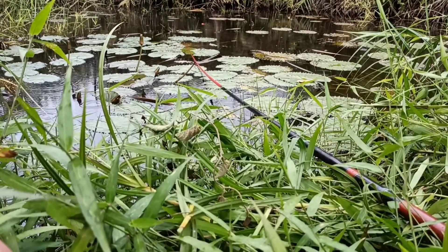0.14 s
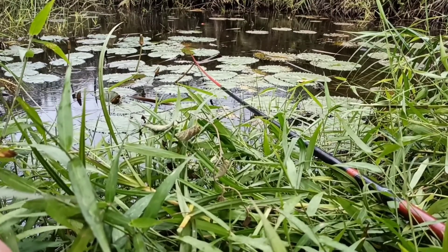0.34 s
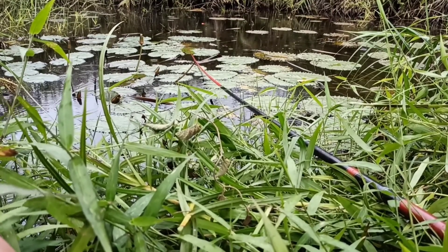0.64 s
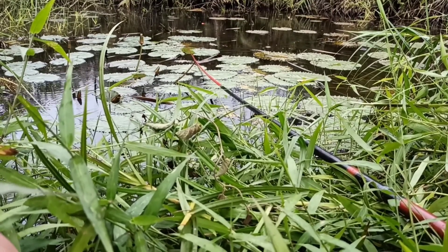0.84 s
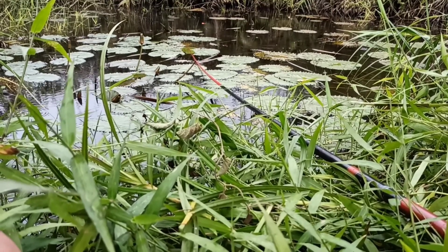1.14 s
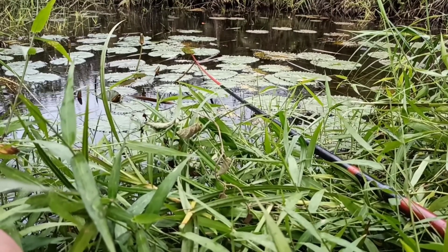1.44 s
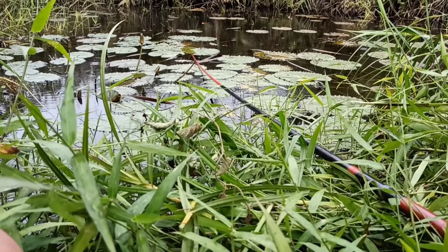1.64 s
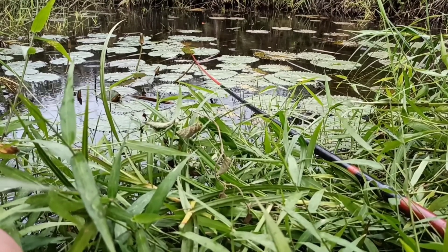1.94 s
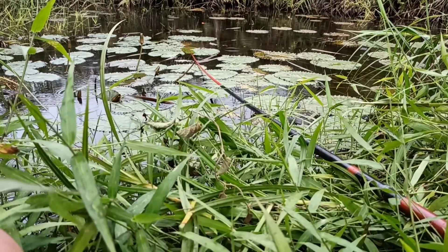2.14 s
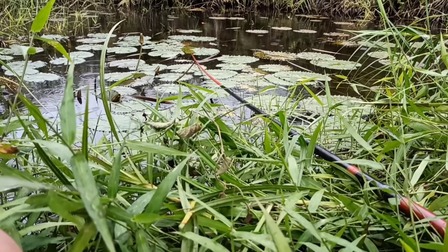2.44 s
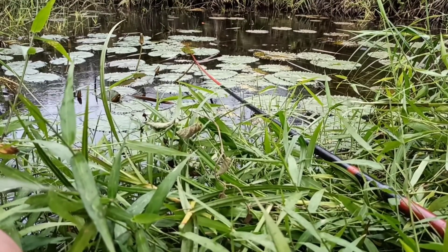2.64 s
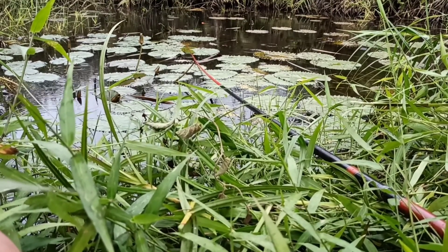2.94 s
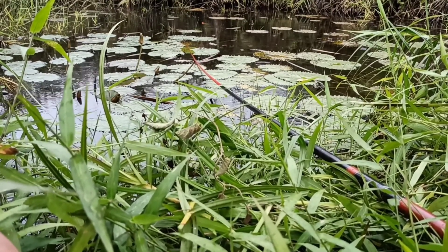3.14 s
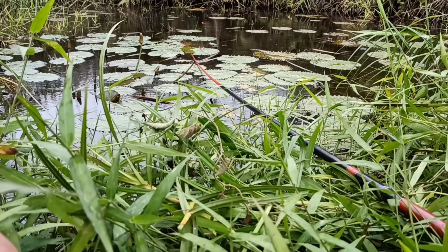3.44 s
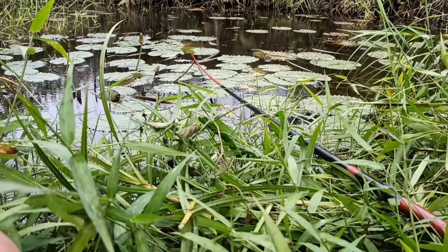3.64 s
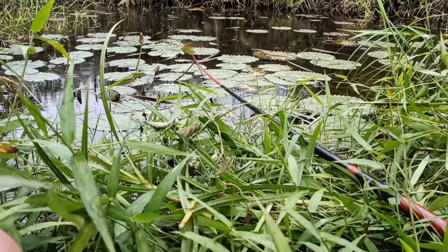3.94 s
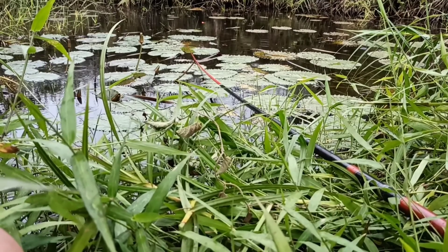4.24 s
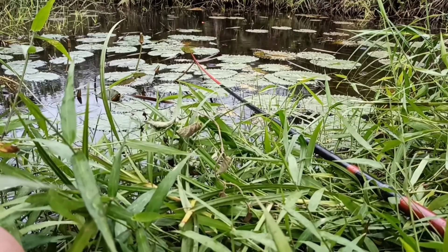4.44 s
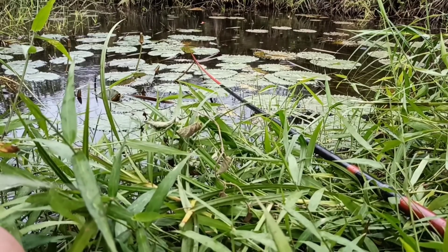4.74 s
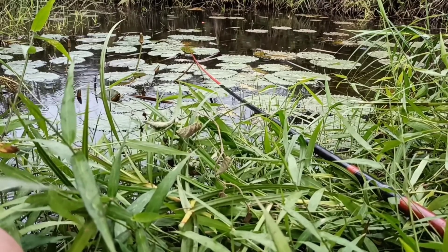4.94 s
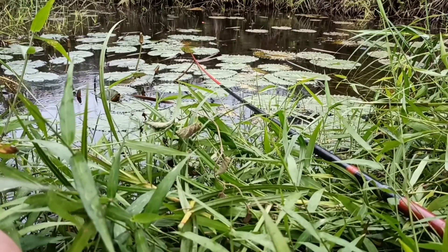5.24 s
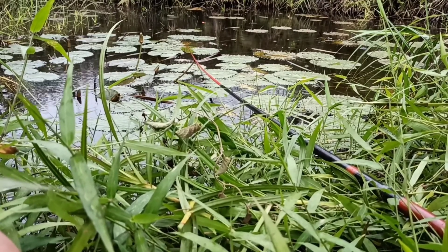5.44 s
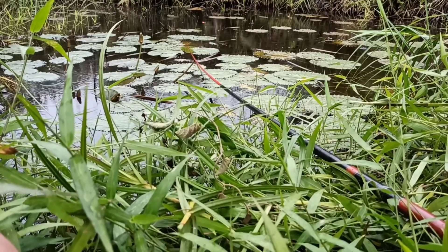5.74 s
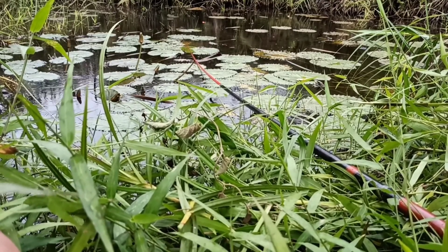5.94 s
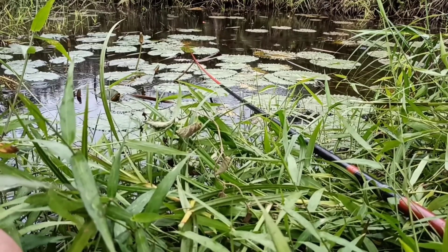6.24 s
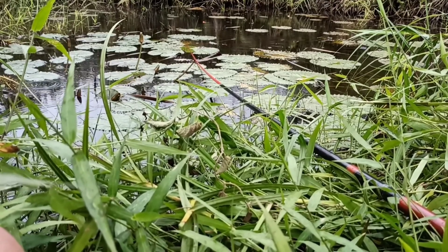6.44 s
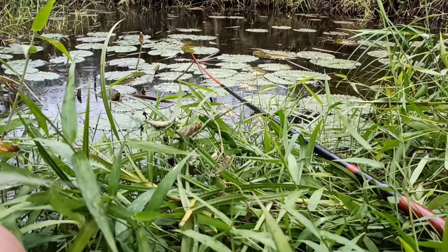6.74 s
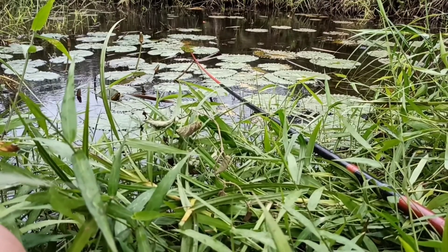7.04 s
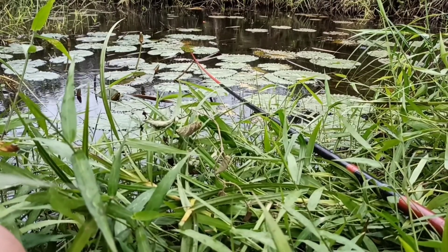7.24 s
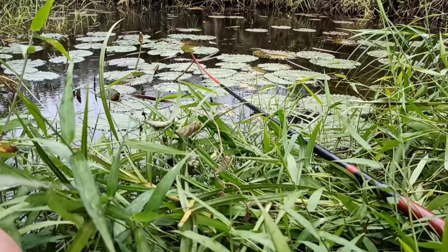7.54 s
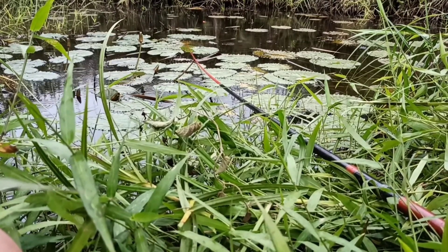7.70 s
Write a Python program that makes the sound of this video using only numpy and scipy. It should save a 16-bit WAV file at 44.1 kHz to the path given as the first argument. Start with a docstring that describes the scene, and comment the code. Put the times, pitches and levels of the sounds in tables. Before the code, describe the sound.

Outdoor mono pickup close to waterside plants: short, dry, creaky frog clicks about seven per second, first a very near frog, later another somewhat quieter one, with faint frogs overlapping behind. A high, fast cricket trill fills the first half and then ceases. Tiny leaf crackles and stem ticks pepper a quiet bed of distant frogs, shimmering insects, soft air and low engine hum, with slight scatter from reeds and bank.

```python
"""Small frogs, near and far, call in runs of rattling clicks at a weedy pond by day.
Each call is a row of pulses ringing a vocal sac and throat, with scatter from reeds and bank.
A cricket's gated wing tone trills until it is disturbed; high peeps slide down.
Stems tick and leaves crackle as noise puffs; far frogs, insects, a far engine and air are
coloured noise whose bands flicker in level."""
import sys
import numpy as np
from scipy import signal
from scipy.fft import rfft, irfft, next_fast_len
from scipy.io import wavfile

SR = 44100
rng = np.random.default_rng(int(sys.argv[2]) if len(sys.argv) > 2 else 0)


def master(y):
    """Save y as 16-bit WAV."""
    cut = np.clip(np.atleast_2d(y).T, -1, 1)
    pcm = np.round(cut * 32767)  # scale
    wavfile.write(sys.argv[1], SR, pcm.astype(np.int16))


N = 347067


def from_db(db):
    """Decibels to amplitude gain."""
    return 10 ** (np.asarray(db) / 20)


def rms_one(x):
    """Scale to rms 1."""
    return x / np.sqrt(np.mean(x ** 2) + 1e-20)


def gain_curve(rows):
    """Gain per sample from (time [s], level [dB]) rows."""
    return from_db(np.interp(np.arange(N) / SR, *np.transpose(rows)))


def drift(rate_hz):
    """Linear interpolation between unit-spread random points, rate_hz of them a second."""
    points = rng.standard_normal(1000)
    return np.interp(np.arange(N) / SR * rate_hz, np.arange(1000), points)


def coloured(spectrum, patchy_db, rate_hz):
    """Noise of rms 1 with this spectrum, in six overlapping bands that flicker independently."""
    size = next_fast_len(N)
    log_hz = np.log(np.arange(size // 2 + 1) * SR / size + 1e-3)
    points_hz, points_db = np.transpose(spectrum)
    log_points = np.log(points_hz)
    tone_db = np.interp(log_hz, log_points, points_db, -120, -120)
    bins = rfft(rng.standard_normal(size)) * from_db(tone_db)
    place = np.interp(log_hz, log_points[[0, -1]], [0, 5])
    total = np.zeros(N)
    for k in range(6):
        weight = np.sqrt(np.clip(1 - abs(place - k), 0, 1))
        band = irfft(bins * weight, size)[:N]
        total += band * from_db(patchy_db * drift(rate_hz))
    return rms_one(total)


def add(out, start_s, sound):
    """Mix a sound in at start_s."""
    at = round(start_s * SR)
    out[at:at + len(sound)] += sound[:max(N - at, 0)]


def air():
    """Steady broadband noise with flickering bands."""
    # Air spectrum: (frequency [Hz], relative level [dB])
    air_tone = [(600, 6.5), (5000, -5), (8400, -10), (10000, -7.5), (11600, -9.5), (12900, -4),
                (13200, 0.5), (15700, 4)]
    return from_db(-66.5) * coloured(air_tone, patchy_db=2.3, rate_hz=30)


def engine():
    """Far engine hum: mostly low noise on a slow level curve."""
    # Engine level: (time [s], rms level [dB])
    engine_level = [(0, -56), (3, -57), (5, -57), (6.2, -55), (7.87, -56)]
    # Engine spectrum: (frequency [Hz], relative level [dB])
    engine_tone = [(12, -53), (20, -24), (22, -34), (32, -36), (35, -49), (48, -13.5), (108, 3), (144, -2),
                   (181, -4.5), (224, -6), (369, -14.5), (821, -25), (981, -23.5), (1240, -34.5),
                   (1400, -26), (1820, -33.5), (3080, -120)]
    return gain_curve(engine_level) * coloured(engine_tone, patchy_db=1.26, rate_hz=5)


def shimmer():
    """Insect chorus blurred into high noise with fast level flicker."""
    # Shimmer level: (time [s], rms level [dB])
    shimmer_level = [(0, -57), (1.1, -59), (3.2, -59), (3.9, -57.5), (4.4, -59.5), (7.87, -59)]
    # Shimmer spectrum: (frequency [Hz], relative level [dB])
    shimmer_tone = [(3350, -52), (5700, -17), (5880, -17), (6140, -7.5), (6470, 4.5), (6780, 8.5),
                    (7140, 3), (7560, 5), (7780, -13.5), (7980, -10.5), (8470, -11), (8630, -32),
                    (8800, -22), (8860, -20), (9000, -37), (11700, -62), (19800, -120)]
    return gain_curve(shimmer_level) * coloured(shimmer_tone, patchy_db=2.5, rate_hz=70)


def chorus():
    """Far frogs blurred together into flickering noise."""
    # Far chorus level: (time [s], rms level [dB])
    chorus_level = [(0, -60), (.5, -60), (1.2, -62), (2.5, -61), (3.2, -63), (3.7, -60), (4.3, -63),
                    (5.2, -61), (6.6, -62.5), (7.6, -59.5), (7.87, -64)]
    # Far chorus spectrum: (frequency [Hz], relative level [dB])
    chorus_tone = [(680, -48), (1150, -11.5), (1300, -32), (1650, -6.5), (1890, -6.5), (2890, -12.5),
                   (3220, -5), (3910, 5.5), (4580, -3.5), (4980, -19), (5200, -46), (6760, -55),
                   (11400, -120)]
    return gain_curve(chorus_level) * coloured(chorus_tone, patchy_db=3.0, rate_hz=22)


def crackle():
    """Tiny random ticks in the leaves: sparse bright clicks of uneven size."""
    rate_per_s, faintest_db = 30, -62.5   # level ahead of the filters
    born = rng.random(N) < rate_per_s / SR
    extra_db = 5.5 * np.minimum(rng.exponential(1, N), 2.5)
    clicks = born * from_db(faintest_db + extra_db)
    decay = signal.lfilter([1], [1, -.97], clicks + 1e-18)   # dies within a few ms
    puffs = decay * rng.standard_normal(N)
    return signal.sosfilt(signal.butter(2, 5500, "high", fs=SR, output="sos"), puffs)


def ticks():
    """Very short decaying noise puffs, each coloured by the stem that snaps."""
    # Stem ticks: (time [s], peak level [dB], band centre [Hz], band width [octaves])
    tick_rows = [(.132, -46, 8000, 1.6), (.2075, -37, 8000, .3), (.721, -43, 2270, 2.2),
                 (1.292, -49, 9000, 1.5), (2.46, -49, 8350, .5), (2.687, -47, 7500, .9),
                 (2.78, -49, 1910, .5), (2.898, -50, 2800, .44), (3.3265, -41, 3700, .6),
                 (3.3265, -43, 7200, .4), (3.654, -48.5, 2200, .4), (4.133, -47.5, 2774, .29),
                 (4.311, -41, 13000, .9), (4.385, -46, 13900, .6), (4.485, -36, 3900, .35),
                 (4.4855, -29, 7200, .3), (4.487, -50, 1150, .47), (4.851, -49, 10000, .9),
                 (5.124, -52, 6570, 1.0), (5.878, -47, 9820, .9), (5.9855, -44, 13000, .4),
                 (5.9865, -36, 7300, .35), (6.165, -51, 11500, .7), (7.7, -48, 4000, .6)]
    t60_s = 0.0076
    out, t = np.zeros(N), np.arange(600) / SR
    for start_s, peak_db, centre_hz, octaves in tick_rows:
        puff = rng.standard_normal(600) * from_db(-60 * t / t60_s)
        edges_hz = centre_hz * 2 ** (np.array([-.5, .5]) * octaves)
        edges_hz = np.minimum(edges_hz, [15000, 20000])
        snap = signal.sosfilt(signal.butter(2, edges_hz, "band", fs=SR, output="sos"), puff)
        add(out, start_s, from_db(peak_db) * snap / abs(snap).max())
    return out


def peeps():
    """Thin sine whistles sliding down 300 Hz under a half-sine envelope."""
    # Peeps: (time [s], peak level [dB], mid pitch [Hz], length [s])
    peep_rows = [(6.612, -61, 8310, 0.035), (7.45, -60, 8310, 0.035)]
    out = np.zeros(N)
    for start_s, peak_db, hz, length_s in peep_rows:
        t = np.arange(round(length_s * SR)) / SR
        envelope = np.sin(np.pi * t / length_s)
        cycles = hz * t + 150 * t * (1 - t / length_s)
        add(out, start_s, from_db(peak_db) * envelope * np.sin(2 * np.pi * cycles))
    return out


def cricket():
    """Near-pure wing tone, gated stroke by stroke, sinking in pitch along each chirp."""
    # Wing strokes of one chirp: (place in the chirp [0-1], relative level [dB])
    strokes = [(.17, -4), (.51, 2), (.81, 6.5)]
    chirps_per_s, slowing_per_s2, first_place = 37.29, .08, .625   # rate and place at 0 s
    wing_hz, waver_hz, sink_hz = 7256, 11, 70   # mid pitch, random spread, fall along a chirp
    trill_db, trill_end_s = -59.7, 4.32
    t = np.arange(N) / SR
    place = ((chirps_per_s - slowing_per_s2 * t / 2) * t + first_place) % 1
    gate = sum(from_db(db) * np.exp(-((place - p) / 0.1) ** 2) for p, db in strokes)
    pitch_hz = wing_hz + waver_hz * drift(17) - sink_hz * (place - .5)
    tone = np.sin(2 * np.pi * np.cumsum(pitch_hz) / SR)
    singing = np.clip((trill_end_s - t) / .01, 0, 1)
    return from_db(trill_db + 1.4 * drift(30.25)) * singing * rms_one(gate * tone)


def bank(x):
    """Dense scatter from reeds and bank: convolution with decaying noise."""
    scatter_db, t60_s = -11.5, 0.17
    t = np.arange(SR // 3) / SR
    fade_in = np.clip(t / 0.0024, 0, 1)
    echoes = rng.standard_normal(len(t)) * from_db(-60 * t / t60_s) * fade_in
    echoes /= np.sqrt(np.sum(echoes ** 2))
    return from_db(scatter_db) * signal.fftconvolve(x, echoes)[:N]


def ring(t, hz, t60_s):
    """Damped sine that swells softly from t = 0."""
    swell_s = 0.00055
    t = np.maximum(t, 0)
    swell = 1 - np.exp(-(t / swell_s) ** 2)
    return swell * np.sin(2 * np.pi * hz * t) * from_db(-60 * t / t60_s)


def frogs():
    """Each call is a row of pulses; each rings the sac and the lower throat, with an air rasp."""
    # Vocal sac modes: (multiple of pitch, relative level [dB], t60 [s])
    sac_modes = [(1.0, 19, 0.019), (1.05, 4, 0.024), (1.10, -2, 0.019), (0.929, -14, 0.0098),
                 (1.17, -18, 0.013), (1.92, -23, 0.0073), (3.4, -35, .005)]
    # Throat modes: (frequency ahead of the size multiple [Hz], relative level [dB], t60 [s])
    throat_modes = [(1570, 6, 0.012), (1840, 4, 0.011), (2050, -1, 0.01), (2410, 2, 0.014),
                    (2630, 1, 0.014)]
    # Runs, each sung by one frog (one frog may sing more than one run): ((sac pitch [Hz], throat level against
    # sac [dB], call length [s], pitch rise across a call [share], throat pitch [multiple]), calls), calls:
    # (time [s], sac rms level [dB])
    frog_runs = [ ((3955, -27, .016, .02, 1.08), [(0.0, -27), (.141, -28), (.2841, -26.5), (.435, -28),
                 (.593, -28.5)]), ((3830, -14, .021, .07, 1.05), [(.065, -49), (.213, -50), (.36, -51),
                 (.512, -52), (.665, -51.5), (.823, -51.5)]), ((3860, -1, .021, .02, 1.05), [(1.289, -63),
                 (1.42, -64), (1.557, -62), (1.698, -62.5), (1.844, -60.5), (1.988, -61.5), (2.139, -60),
                 (2.281, -61)]), ((3450, -8, .03, .03, .93), [(2.67, -57)]), ((3810, -13, .036, .19, 1.03),
                 [(2.032, -59.5), (2.178, -55.5), (2.315, -53.5), (2.465, -52), (2.622, -53.5),
                 (2.778, -52.5), (2.95, -53.5), (3.128, -53)]), ((3890, -2.5, .023, .02, 1.07),
                 [(3.452, -62), (3.582, -59), (3.721, -58.5), (3.861, -57), (4.008, -58.5)]),
                 ((3700, -10.5, .021, .02, 1.005), [(4.512, -38.5), (4.6372, -36), (4.773, -36.5),
                 (4.914, -37), (5.062, -36.5), (5.2185, -36), (5.377, -36), (5.554, -36)]),
                 ((3660, -13, .022, .07, 1.03), [(5.002, -53.5), (5.124, -49.5), (5.272, -51),
                 (5.43, -51.5), (5.748, -51), (5.915, -51.5), (6.087, -53.5), (6.261, -53.5),
                 (6.414, -62)]), ((4050, -8, .036, .055, 1.03), [(6.494, -62), (6.635, -59), (6.792, -59),
                 (6.943, -60), (7.104, -61), (7.26, -59), (7.431, -57.5), (7.597, -59)]),
                 ((3950, 3, .022, .02, 1.06), [(6.707, -61), (6.841, -58), (6.993, -59), (7.145, -58),
                 (7.308, -58.5), (7.465, -56.5), (7.628, -58.5), (7.847, -65)])]
    pulse_hz, pulse_jitter = 418, 0.1226   # jitter as a share of the interval
    call_spread, pulse_spread = .01, 0.013   # random pitch, as a share
    near_db, dulling = -40, .45   # fainter is far: throat tilt in dB per kHz per dB below near_db
    rasp_db, rasp_t60_s, rasp_band_hz = -25, 0.016, [5300, 8400]   # level against the sac
    voice_floor_hz = 1440   # so small a body sends out nothing low
    out, t = np.zeros(N), np.arange(2800) / SR
    rasp_filter = signal.butter(1, rasp_band_hz, "band", fs=SR, output="sos")
    calls = [call + frog for frog, run in frog_runs for call in run]
    for start_s, level_db, hz, throat_db, length_s, rise, size in calls:
        chance = rng.standard_normal((3, 18))
        starts_s = np.cumsum(1 + pulse_jitter * chance[0]) / pulse_hz
        starts_s -= starts_s[0]
        strength = from_db(1.5 * chance[1])
        strength /= 1 + np.exp((starts_s - length_s) / 0.0017)   # pulses fade past the length
        glide = rise * (starts_s / max(length_s, .004) - .5)
        spread = pulse_spread * chance[2] + call_spread * rng.standard_normal()
        pitch_hz = hz * (1 + glide + spread)
        since_s = t[:, None] - starts_s

        sac = sum(from_db(db) * ring(since_s, k * pitch_hz, t60) for k, db, t60 in sac_modes)
        sac = sac @ strength
        tilt_db_per_hz = dulling * min(level_db - near_db, 0) / 1000
        throat = sum(from_db(db + tilt_db_per_hz * f) * ring(since_s, size * f, t60)
                     for f, db, t60 in throat_modes)
        throat = throat @ strength
        scratch = (since_s > 0) * from_db(-60 * abs(since_s) / rasp_t60_s)
        rasp = signal.sosfilt(rasp_filter, rng.standard_normal(2800)) * (scratch @ strength)

        body = round(length_s * SR)   # all parts are levelled over the body of the call
        voice = sac / sac[:body].std()
        voice += from_db(throat_db) * throat / throat[:body].std()
        voice += from_db(rasp_db) * rasp / rasp[:body].std()
        add(out, start_s, from_db(level_db) * voice)
    return signal.sosfilt(signal.butter(6, voice_floor_hz, "high", fs=SR, output="sos"), out)


def scene():
    """Frog calls with their scatter, small events and steady beds, as one channel."""
    beds = air() + engine() + shimmer() + chorus()
    events = crackle() + ticks() + peeps() + cricket()
    calls = frogs()
    return (beds + events + calls + bank(calls))[None]


def record(dry):
    """Hollow out a treble band, then cut the top."""
    # Treble hollow: (frequency [Hz], gain [dB])
    hollow_curve = [(8450, 1), (8650, -6.5), (9700, -16.5), (11480, -15), (11600, -4)]
    cutoff_hz = 15620
    size = next_fast_len(N)
    hz = np.arange(size // 2 + 1) * SR / size
    gain = from_db(np.interp(hz, *np.transpose(hollow_curve), 0, 0))
    hollow = irfft(rfft(dry, size) * gain, size)[:, :N]
    return signal.sosfilt(signal.cheby2(24, 30, cutoff_hz, fs=SR, output="sos"), hollow)


dry = scene()
out = record(dry)
master(out)
```